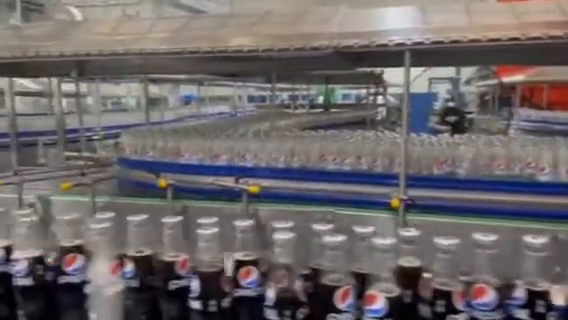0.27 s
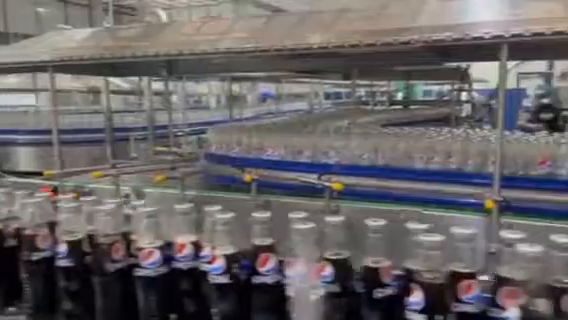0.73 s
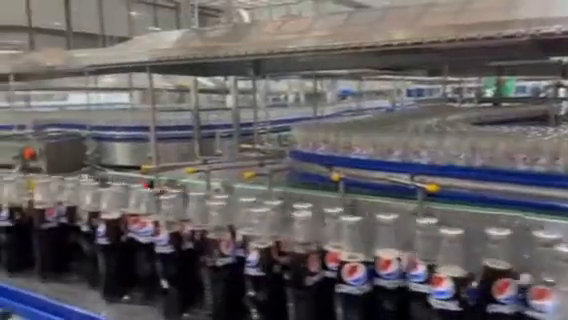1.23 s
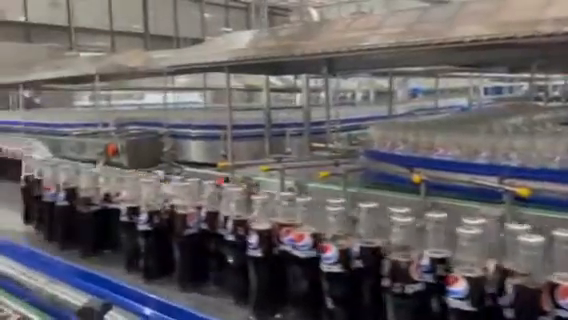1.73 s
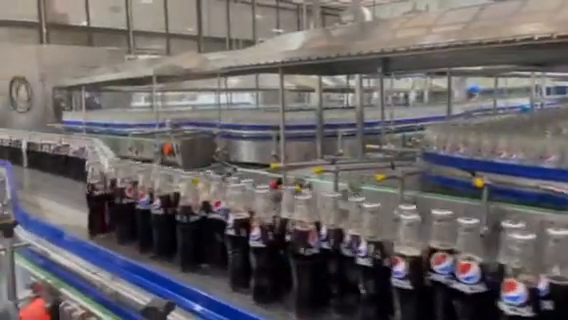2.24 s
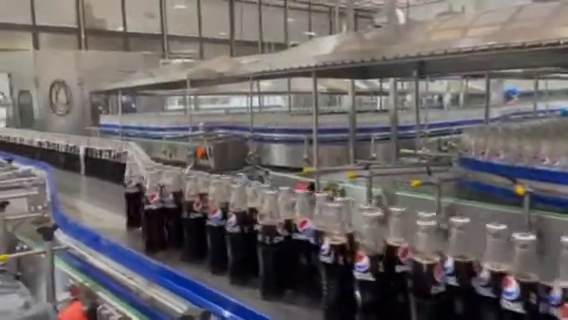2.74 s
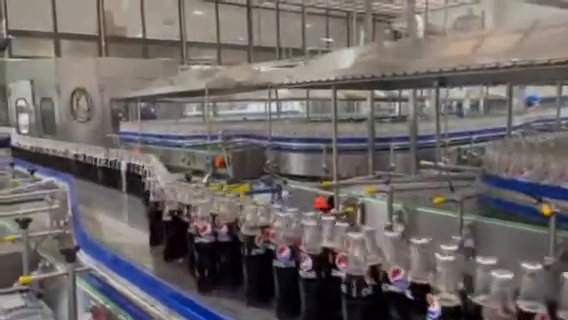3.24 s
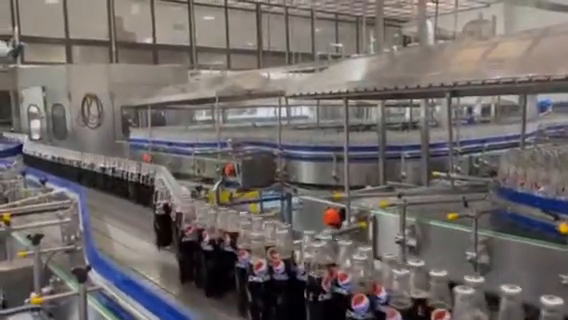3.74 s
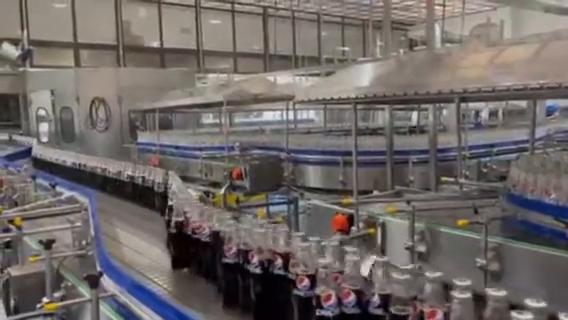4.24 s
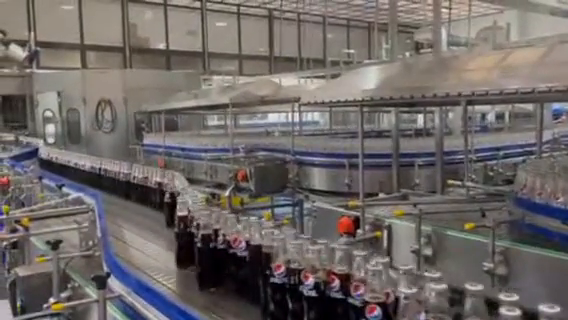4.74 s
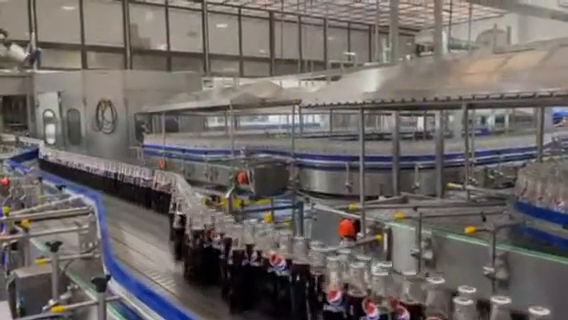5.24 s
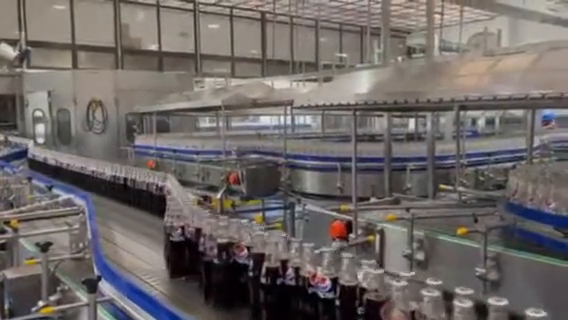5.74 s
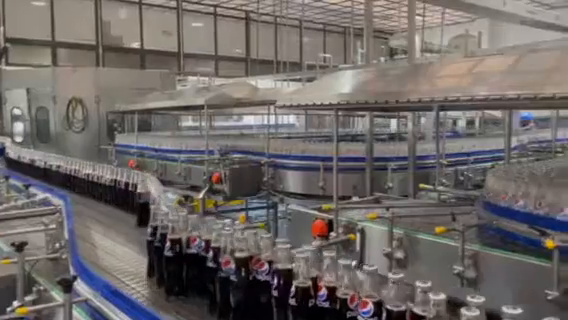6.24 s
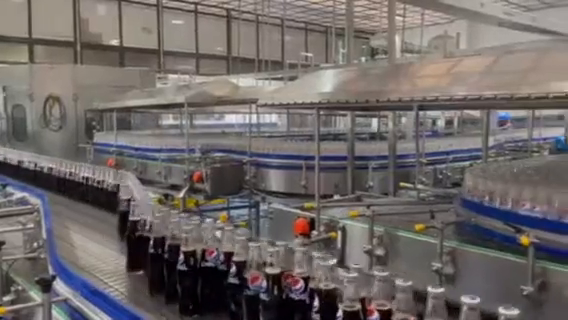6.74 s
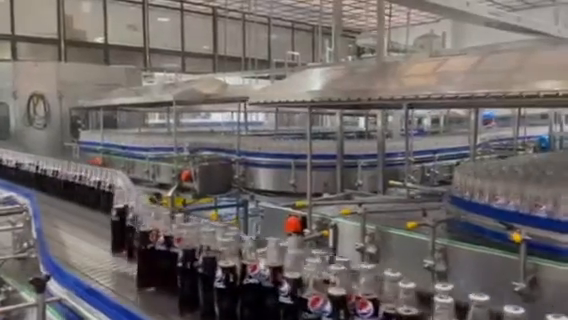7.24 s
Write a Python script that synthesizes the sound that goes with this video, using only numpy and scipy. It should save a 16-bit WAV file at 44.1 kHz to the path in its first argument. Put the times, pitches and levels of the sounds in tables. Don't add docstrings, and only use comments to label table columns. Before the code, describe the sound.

A steady industrial wash fills a reverberant plant while a dense pack of glass bottles shivers and rattles close by. After a lighter opening of scattered clinks, the pack squeezes together into loud ringing bursts through the middle, then continues in uneven knocks and high pings to the end. Motors drone and swell, air hisses softly, and close, wide stereo pickup places individual contacts left and right.

```python
import sys
import numpy as np
from scipy import signal
from scipy.fft import rfft, irfft
from scipy.io import wavfile

SR = 44100
rng = np.random.default_rng(int(sys.argv[2]) if len(sys.argv) > 2 else 0)


def waveform_to_disk(signal):
    frames = np.transpose(np.atleast_2d(signal))
    scaled = np.clip(frames, -1, 1) * 32767
    samples = np.round(scaled).astype(np.int16)
    wavfile.write(sys.argv[1], SR, samples)


def how_loud(loudness_db):
    steps = np.asarray(loudness_db, float) / 20
    return 10 ** steps


N = 330750

# level in dB, share of the turn heard,
# swell in dB/s, ebb in dB/s.
CALM = [
    (-39, 0.53, 74, 70),
    (-36.5, 0.74, 152, 105),
    (-38.5, 1.6, 63, 9.5),
    (-42.5, 1, 62, 31),
    (-28, 0.85, 44, 29),
]
# start in seconds, held seconds, level in dB.
BELLY_SURGES = [
    (1.35, 0.05, -33),
    (2.7, .1, -39),
    (3.0, .2, -37.5),
    (4.15, 0.12, -40),
    (4.9, 0.27, -35),
    (5.8, 0.31, -34),
    (7.45, .05, -34),
]


def rms_one(x):
    return x / np.sqrt(np.mean(x ** 2) + 1e-20)


def at_hz(rows, hz):
    f, *columns = np.transpose(rows)
    log_hz = np.log(np.maximum(hz, 1))
    return [np.interp(log_hz, np.log(f), c) for c in columns]


def drift(rate_hz):
    step, settle = 40, 2000
    r = np.exp(-2 * np.pi * rate_hz * step / SR)
    noise = rng.standard_normal(N // step + settle + 2)
    slow = signal.lfilter([1], [1, -2 * r, r * r], noise)[settle:]
    return np.interp(np.arange(N) / step, np.arange(len(slow)), rms_one(slow - slow.mean()))


def surging(rows, rest):
    # time in seconds, level in dB.
    facing = [
        (0, -0.5),
        (1.2, -2),
        (2.0, -0.5),
        (2.6, -1),
        (3.6, 0.5),
        (4.6, -1),
        (5.3, -0.6),
        (6.8, -0.5),
        (7.5, -0.5),
    ]
    rest_db, share, swell_db_s, ebb_db_s = rest
    t = np.arange(0, N + 99, 100) / SR
    power = how_loud(2 * (rest_db + share * np.interp(t, *np.transpose(facing))))
    for start_s, held_s, peak_db in rows:
        before_s = np.maximum(start_s - t, 0)
        after_s = np.maximum(t - start_s - held_s, 0)
        power = power + how_loud(2 * (peak_db - swell_db_s * before_s - ebb_db_s * after_s))
    return np.interp(np.arange(N) / SR, t, 10 * np.log10(power))


def ring(clicks, hz, t60_s):
    r = np.exp(-np.log(1000) / (t60_s * SR))
    w = 2 * np.pi * hz / SR
    return signal.lfilter([0, np.sin(w)], [1, -2 * r * np.cos(w), r * r], clicks + 1e-18)


def jostle(spread_db, count=32):
    # low in Hz, high in Hz, t60 in seconds, level in dB.
    glass = [
        [(2687, 2860, 0.21, -5), (2822, 2990, 0.15, -3.5)],
        [(3448, 3950, 0.072, -8), (3930, 4650, 0.07, -8.5)],
        [(4674, 5050, 0.1, -4.5), (5126, 5430, 0.08, -5)],
        [(5670, 6080, 0.06, -4.5), (6460, 7500, 0.05, -9)],
    ]
    # low in Hz, high in Hz, t60 in seconds, level in dB over the machines.
    bellies = [
        (644.4, 2600, 0.086, -8),
    ]
    contacts_per_s = [
        1600,
        258,
        893,
        500,
        203.6,
    ]
    # start in seconds, held seconds, level in dB.
    body_surges = [(.48, .01, -37), (.85, .05, -37), (2.34, .05, -34), (2.86, 0.12, -29.5),
                   (3.0, 0.22, -32.5), (3.28, 0.28, -35), (3.72, 0.19, -31), (4.11, 0.19, -35.5),
                   (4.43, 0.089, -32), (4.72, 0.21, -33), (5.4, 0.031, -33), (5.75, .1, -36),
                   (6.28, 0.29, -33.5), (6.81, .02, -34), (6.98, .02, -40), (7.2, .05, -36)]
    loose_surges = [(0, .01, -34), (.32, .03, -32), (.96, 0.025, -29.5), (1.55, .05, -37),
                    (2.33, 0.042, -30), (2.8, 0.1, -33.5), (2.95, 0.27, -33.5), (3.38, .05, -40),
                    (3.7, .03, -35), (4.8, 0.045, -33), (5.18, .01, -37), (5.48, .03, -34),
                    (5.67, 0.097, -33), (6.0, .02, -37), (6.7, .04, -33), (6.97, .02, -31), (7.2, .05, -33),
                    (7.43, .01, -33)]
    shoulder_surges = [(.05, .1, -38), (.62, 0.21, -38), (1.35, 0.2, -39), (.95, .03, -43),
                       (2.27, .05, -32.5), (2.75, 0.089, -38), (3.1, .15, -42), (3.4, 0.17, -32),
                       (3.82, 0.046, -42), (4.12, .05, -32), (4.83, .1, -31.5), (5.27, .05, -32),
                       (5.8, .05, -35), (6.2, .1, -33), (7.12, 0.043, -30)]
    neck_surges = [(.05, .05, -47), (1.55, .05, -38.5), (2.2, .5, -39), (3.44, .05, -37.5),
                   (4.12, .05, -36.5), (4.82, .1, -39), (5.21, .03, -35.5), (5.48, .03, -38.5),
                   (5.75, .1, -37), (6.98, .02, -41), (7.14, .05, -36)]
    surges = [body_surges, loose_surges, shoulder_surges, neck_surges, BELLY_SURGES]

    crowd = np.zeros((2, N))
    for rows, calm, families, per_s in zip(surges, CALM, glass + [bellies], contacts_per_s):
        level_db = surging(rows, calm)
        for low_hz, high_hz, t60_s, family_db in families:
            force_db = spread_db * np.minimum(rng.exponential(1, N), 4)
            force = how_loud(force_db) * rng.choice([-1, 1], N)
            touch = force * (rng.random(N) < per_s / SR)
            bottle = rng.integers(0, count, N)
            rank = (np.arange(count) + rng.random(count)) / count
            bunched = rank + 0.0923 * np.sin(2 * np.pi * rank)
            pitches_hz = low_hz + (high_hz - low_hz) * bunched
            rings = [ring(touch * (bottle == k), hz, t60_s) for k, hz in enumerate(pitches_hz)]
            fields = np.array([sum(rings[::2]), sum(rings[1::2])])
            crowd += how_loud(level_db + family_db) * rms_one(fields)
    return crowd


def clinks(rows, t60_s, gain_db, detune, rise_s, others=0.52, count=3):
    t = np.arange(SR // 4) / SR
    out = np.zeros((2, N + SR))
    shape = np.exp(-np.log(1000) * t / t60_s) * (1 - np.exp(-t / rise_s))
    chances = rng.random((len(rows), count + 1)) - .5
    for (start_s, peak_db, hz, pan_db), chance in zip(rows, chances):
        heard_s = t + 0.00005 * chance[0] * np.array([[1], [-1]])
        modes = np.sin(2 * np.pi * hz * heard_s)
        for c in chance[1:]:
            modes += others * np.sin(2 * np.pi * (hz * (1 + detune * c) * heard_s + 10 * c))
        at = round(start_s * SR)
        pan_db = np.clip(pan_db, -4, 4)
        level_db = peak_db + gain_db + np.array([[pan_db], [-pan_db]]) / 2
        out[:, at:at + len(t)] += how_loud(level_db) * shape * modes
    return out[:, :N]


def near_clinks():
    # start in seconds, peak in dB, pitch in Hz, left-right in dB.
    body_clinks = [(0.0852, -29, 2920, 0.5), (1.7689, -20, 2750, -2.0), (2.0153, -20, 2800, 0),
                   (2.7427, -23, 2730, -5), (2.8789, -10.5, 2885, -7), (2.9173, -8, 2850, -3),
                   (2.9856, -24, 2890, 0.5), (3.032, -17, 2870, -5), (3.0863, -13, 2750, -2.5),
                   (3.3114, -23, 2760, -0.5), (3.4121, -19, 2820, -3.5), (3.538, -14, 2910, 4),
                   (3.6172, -13, 2780, -0.5), (3.6556, -17, 2780, 0.5), (3.125, -23, 2850, 0),
                   (4.0826, -16, 2890, -1.5), (4.1265, -27, 2800, -5), (4.4363, -14, 2910, -3),
                   (4.6613, -24, 2800, -1.0), (4.738, -17, 2920, 0), (4.8354, -8, 2920, 4),
                   (4.895, -11, 2930, 0), (4.79, -17, 2920, 2), (4.9776, -33, 2910, 4),
                   (5.4216, -29, 2880, 1.5), (5.8731, -24, 2940, -4.0), (5.9953, -18, 2870, 2),
                   (6.2796, -29, 2850, 0), (6.5904, -21, 2870, -1.5), (6.797, -20, 2850, -1.5)]
    loose_clinks = [(0.005, -21, 3800, 0), (0.3094, -26, 4150, 0.0), (0.34, -24, 4550, 0),
                    (0.9694, -27, 3730, 1.5), (1.42, -16, 8400, 0), (2.0194, -22, 3950, 7),
                    (2.3096, -21, 4540, -0.5), (2.593, -25, 4450, 2.0), (2.7994, -25, 4440, -1),
                    (3.021, -20, 4490, 2.0), (3.3794, -30, 4090, 0), (5.6635, -18, 4400, 1.0),
                    (5.7473, -21, 3740, 0.5), (5.8172, -24, 3730, 2.0), (6.9631, -16, 4500, -1),
                    (7.0409, -26, 4010, 1.5), (7.434, -25, 4340, 1.5)]
    clear_pings = [(.47, -23, 2960, -3), (.83, -23, 3570, 2), (.962, -21, 3780, 1), (2.98, -30, 3600, -3),
                   (4.39, -23, 3380, .5), (4.55, -30, 3360, 1), (5.10, -37, 3270, 1), (5.169, -18, 4030, -2),
                   (5.325, -26, 3940, 2), (6.0, -34, 3600, .5),
                   (2.27, -26, 5450, 3), (3.42, -27, 6860, 2.5), (3.49, -31, 6800, 3),
                  (4.15, -29, 5810, 2.5), (4.305, -30, 5950, 2), (5.48, -26, 6700, 1.8),
                  (7.46, -32, 7310, 2.5)]
    shoulder_clinks = [(3.3204, -25, 4860, 2.3), (3.3513, -22, 5010, 2.5), (3.464, -14, 5250, 3.0),
                       (3.494, -21, 4910, 3.0), (3.5748, -20, 4700, 1.5), (3.7868, -13, 4790, 2.5),
                       (3.8432, -11, 4800, 2.0), (3.906, -18, 4850, 3.0), (4.4014, -20, 4770, 3.5),
                       (4.4837, -13, 4800, 1.5), (5.1711, -22, 5170, 1.5), (5.3178, -21, 5270, 1.5),
                       (5.7389, -23, 5200, 2.5), (5.8192, -15, 4750, 1.5), (5.8765, -21, 4960, 4.0),
                       (6.0781, -15, 4830, 2.0), (6.4078, -19, 4880, 2.0), (6.4692, -19, 4950, 3.0),
                       (6.5899, -15, 5200, 1.5), (7.1267, -19, 4900, 3.3), (7.196, -22, 5010, 2.0),
                       (7.3392, -17, 5210, 2.5)]
    knocks = [(0.0453, -17.5, 1880, 0.0), (0.2289, -22, 1700, 4), (0.3094, -14.5, 2100, 0.5),
              (0.322, -21, 2500, 0), (0.345, -20, 2250, 0), (0.9378, -20, 1130, 0),
              (1.3994, -24, 1960, 0.5), (2.0138, -19, 2230, 2), (2.3022, -24, 1410, 0),
              (2.805, -20, 1370, 0.5), (2.9845, -23, 1600, 6), (3.458, -17.5, 2190, 2.5),
              (3.305, -21, 1100, 0), (4.0362, -23, 2010, 0), (4.788, -15.5, 1350, 1.5),
              (4.831, -22, 1210, 0), (4.9023, -16.5, 1700, 0.5), (5.009, -17, 1550, 0),
              (5.1327, -21, 1050, 0), (5.185, -19, 1710, 0), (5.1662, -18, 2230, 8),
              (5.233, -17.5, 2100, 4), (5.7452, -16.5, 1650, 4), (5.85, -18, 1150, 0),
              (5.893, -20, 1740, 0), (6, -18, 2300, -0.5), (6.109, -15, 1500, -3), (6.9287, -21, 1470, 0),
              (7.4794, -20, 1690, 0), (6.785, -15.5, 1900, 9), (7.227, -19, 1610, -1),
              (7.424, -18, 2300, 0.0)]
    pings = clear_pings
    return (clinks(body_clinks, t60_s=0.2, gain_db=-14.5, detune=0.028, rise_s=0.0052)
            + clinks(loose_clinks, t60_s=0.13, gain_db=-8.5, detune=0.102, rise_s=0.0017)
            + clinks(pings, t60_s=0.12, gain_db=-1.5, detune=0.023, rise_s=0.0092, others=0.19)
            + clinks(shoulder_clinks, t60_s=0.11, gain_db=-13, detune=0.096, rise_s=0.0018)
            + clinks(knocks, t60_s=0.063, gain_db=-9.0, detune=0.448, rise_s=0.00079, count=8))


def hall(x, tail_db, t60_s=0.94):
    t = np.arange(SR) / SR
    shape = np.exp(-np.log(1000) * t / t60_s) * (1 - np.exp(-t / 0.0082))
    tails = rng.standard_normal((2, SR)) * shape
    tails = how_loud(tail_db) * tails / np.linalg.norm(tails[0])
    return signal.fftconvolve(x, tails, axes=1)[:, :N]


def wash(shared_db, own_db):
    # frequency in Hz, density in dB per Hz.
    wash_rows = [(22, -88), (30, -79), (42, -75), (72, -62.5), (300, -61.5), (750, -58), (1500, -60),
                 (2000, -62), (2600, -63.5), (3250, -68.5), (5550, -70), (6400, -73.5), (8700, -72),
                 (12000, -77.5), (14200, -75), (15700, -84)]
    # centre in Hz, width in Hz, level in dB.
    hums = [
        (379, 98, -42.5),
        (1220, 120, -45),
        (2232, 14, -51),
    ]
    # start in seconds, held seconds, level in dB over the mean.
    puffs = [
        (1.4, .1, -6),
        (1.85, .7, -4),
        (3.47, 0.14, -0.5),
        (4.25, 0.23, -2),
        (4.85, .4, -4.5),
        (5.65, .12, -1.5),
        (6.0, .03, -1.5),
        (6.3, .05, -10),
        (7.2, .3, -8),
    ]
    # level in dB, share of the turn, swell in dB/s, ebb in dB/s.
    air_rest = (-1.2, 0.2, 53, 46)

    air_db = surging(puffs, air_rest)
    machines_db = surging(BELLY_SURGES, CALM[-1])
    machines_db = machines_db - machines_db.mean()
    out, shared, white = 0, drift(10.0), rng.standard_normal((2, 2, N))
    edges_hz = np.geomspace(20, 17000, 19)
    for k, (low_hz, high_hz) in enumerate(zip(edges_hz, edges_hz[1:])):
        work_db = .7 * air_db if low_hz > 6000 else machines_db * (low_hz > 200)
        depth = np.clip(np.log2(low_hz / 300) / 4, 0, 1) * (.6 if low_hz > 7000 else 1)
        flicker_db = (shared_db * shared + own_db * drift(13.3)) * depth
        sos = signal.butter(2, [low_hz, high_hz], "band", fs=SR, output="sos")
        out = out + how_loud(work_db + flicker_db) * signal.sosfilt(sos, white[k % 2])

    hz = np.fft.rfftfreq(N, 1 / SR)
    power = how_loud(at_hz(wash_rows, hz)[0]) ** 2 * (hz > 15)
    for hum_hz, width_hz, hum_db in hums:
        resonance = 1 / (1 + (2 * (hz - hum_hz) / width_hz) ** 2) ** 2
        power = power + how_loud(hum_db) ** 2 / width_hz * resonance
    return irfft(rfft(out) * np.sqrt(power * SR / 2), N)


def motors():
    # start in seconds, held seconds, level in dB over the mean.
    thumps = [(.17, .02, 9), (.33, .02, 7), (.5, .02, 4), (.76, .1, 1), (1.13, .01, 2), (1.46, .04, 11),
              (1.69, .02, 10), (1.8, .2, 6), (2.12, .02, 6), (2.27, .03, 9), (2.44, .02, 8), (2.63, .02, 6),
              (2.85, .2, 5), (3.24, 0.026, 11.5), (3.7, .06, 3), (4.24, .1, 7), (4.55, .02, 5),
              (4.92, .03, 2), (5.51, .03, 6), (5.72, .02, 0), (6.3, .2, 2), (6.81, .03, -2), (7.12, .03, 6),
              (7.4, .05, 2)]
    # start in seconds, held seconds, level in dB over the mean.
    drone_swells = [
        (.4, .2, 2),
        (1.4, .5, -3),
        (2.8, .06, 5),
        (3.6, 0.35, -6),
        (4.7, 0.26, 3.5),
        (5.2, .25, 3),
        (5.98, 0.23, 5.5),
        (6.7, .1, 1),
        (7.2, .3, 4),
    ]
    # level in dB, share of the turn, swell in dB/s, ebb in dB/s.
    thump_rest = (-6, 0.1, 150, 150)
    drone_rest = (-6, 0.5, 72, 52)
    rumble_hz, rumble_db, drone_hz, drone_db, wobble_hz = 58, -55, 178, -53.5, 2.5

    out = np.zeros((2, N))
    for hz, level_db in [(rumble_hz, rumble_db + surging(thumps, thump_rest)),
                         (drone_hz, drone_db + surging(drone_swells, drone_rest))]:
        phase = 2 * np.pi * np.cumsum(hz + wobble_hz * drift(3.0)) / SR
        out[0] += 2 * how_loud(level_db) * np.sin(phase)
    return out


def ports(fields):
    # frequency in Hz, likeness 0-1, right's lead in rad, left-right in dB.
    port_rows = [(60, 1, 0, 0.7), (307, 0.8, -0.28, 1.5), (850, 0.39, -1.15, 2.5), (1470, 0, -0.28, 1),
                 (1790, 0.1, -4, 0.3), (2300, 0.27, -0.8, -1), (2980, 0.49, -0.94, -1), (3600, 0, -1.04, 1),
                 (4500, 0.83, 0, 1.5), (5240, 0.14, -1.5, 3), (6550, 0.02, -0.6, 1.5),
                 (7680, 0.4, 4.5, 3.5), (8870, 0.81, 3, -0.5), (12930, 0.8, 6, 0)]
    alike, lead_rad, balance_db = at_hz(port_rows, np.fft.rfftfreq(N, 1 / SR))
    alike = np.clip(alike, 0, .99)
    common, apart = rfft(fields) * np.sqrt([1 + alike, 1 - alike]) / np.sqrt(2)
    left = (common + apart) * how_loud(balance_db / 2) * np.exp(-.5j * lead_rad)
    right = (common - apart) * how_loud(-balance_db / 2) * np.exp(.5j * lead_rad)
    return irfft(np.array([left, right]), N)


def scene():
    crowd = jostle(spread_db=3.0)
    near = near_clinks()
    echoes = hall(crowd, tail_db=-6.0) + hall(near, tail_db=-5.0)
    machines = wash(shared_db=0.38, own_db=1.37) + motors()
    return ports(crowd + echoes + machines) + near


def band_limit(x):
    return signal.sosfilt(signal.butter(12, 15760, fs=SR, output="sos"), x)


def record(dry):
    # low in Hz, high in Hz, gain in dB.
    mid_dip = (7390, 9300, -9)
    side_dip = (12380, 16000, -14)
    hz = np.fft.rfftfreq(N, 1 / SR)
    mid, side = rfft([dry[0] + dry[1], dry[0] - dry[1]]) / 2
    thinned = []
    for x, (low_hz, high_hz, gain_db) in [(mid, mid_dip), (side, side_dip)]:
        thinned.append(x * how_loud(gain_db * ((hz > low_hz) & (hz < high_hz))))
    mid, side = thinned
    mix = irfft(np.array([mid + side, mid - side]), N)
    return band_limit(mix)


dry = scene()
out = record(dry)
waveform_to_disk(out)
```